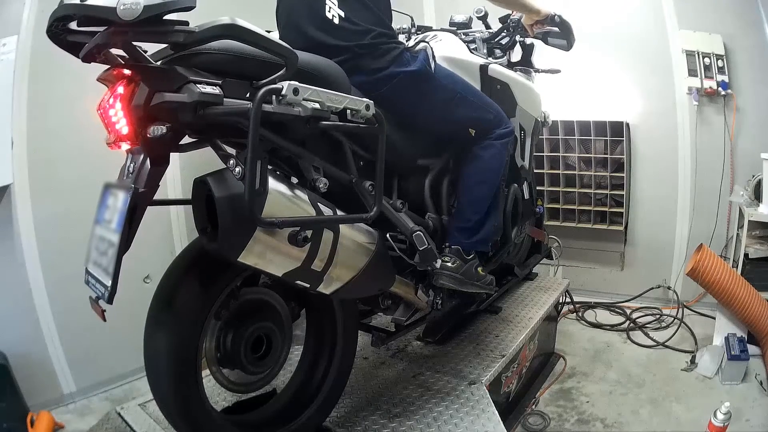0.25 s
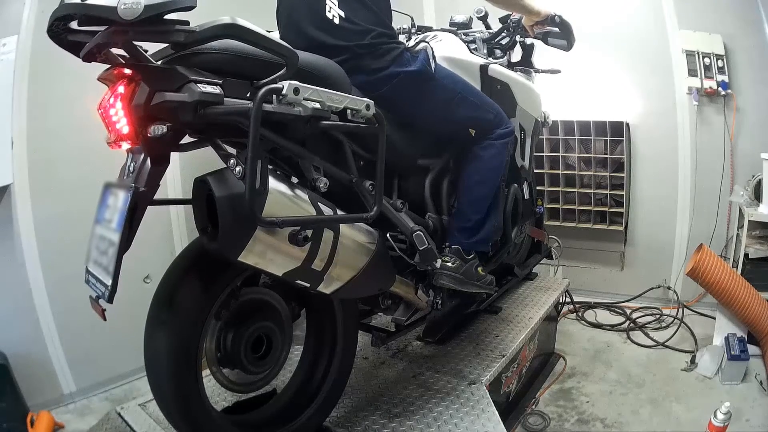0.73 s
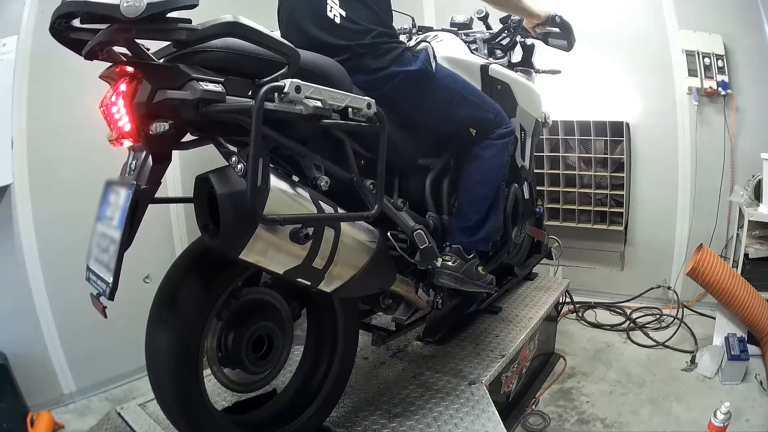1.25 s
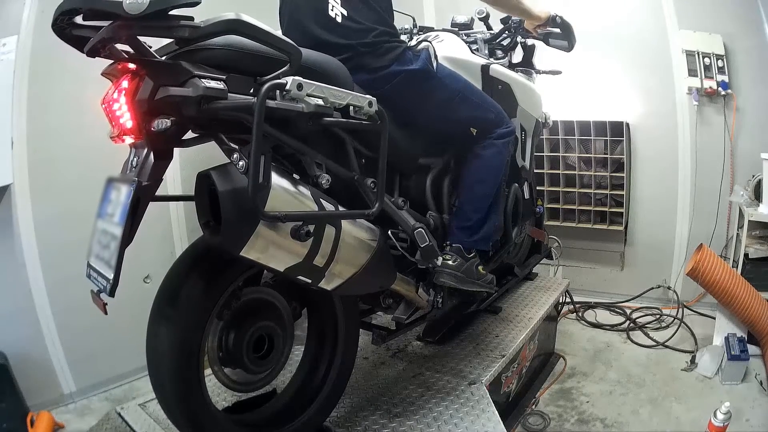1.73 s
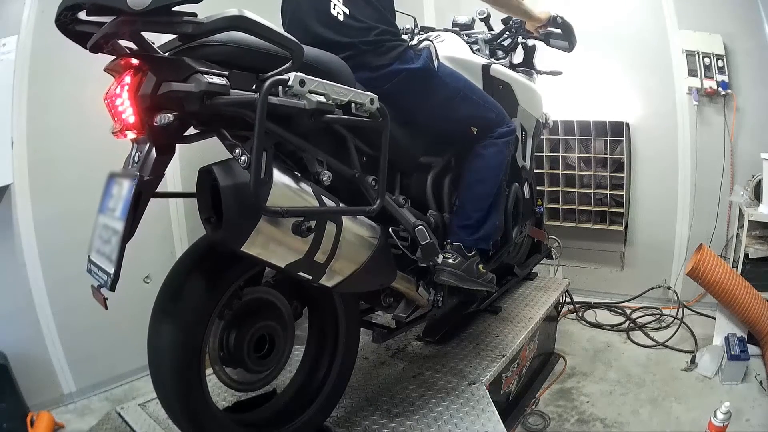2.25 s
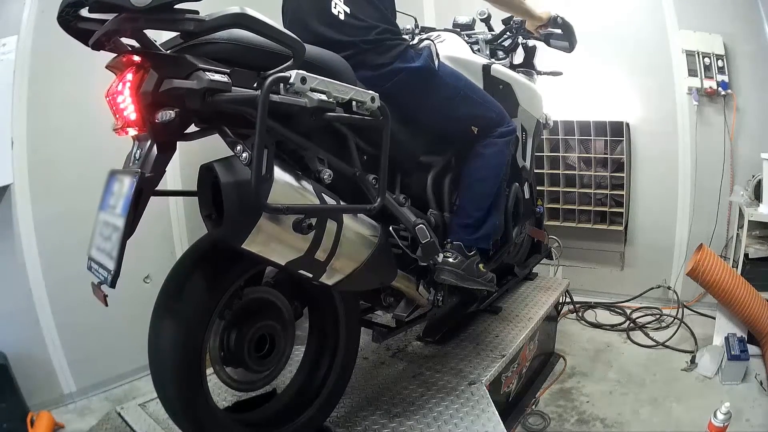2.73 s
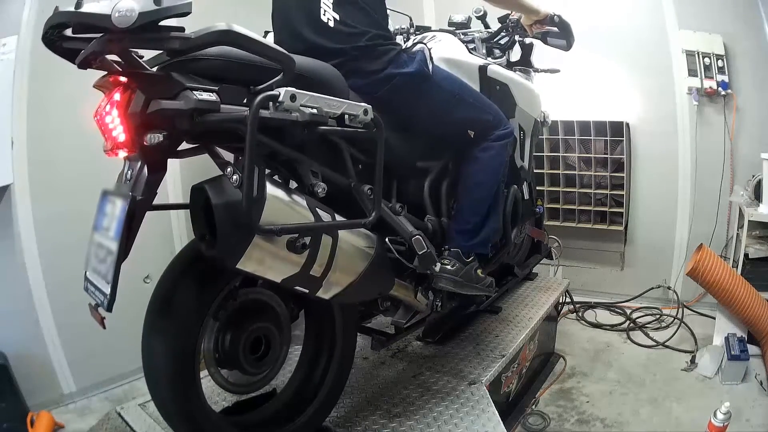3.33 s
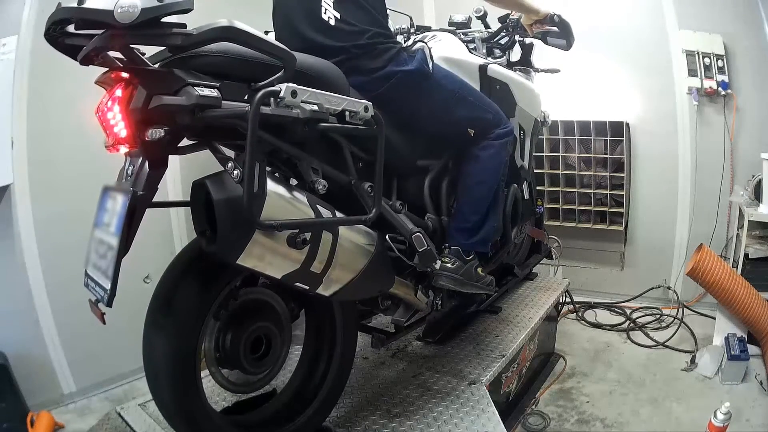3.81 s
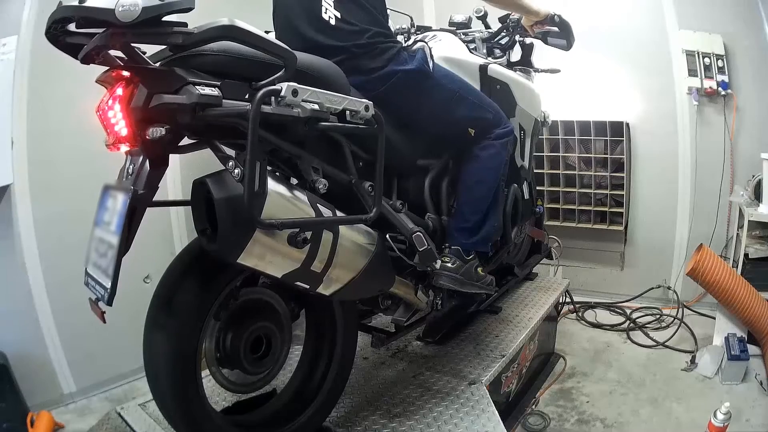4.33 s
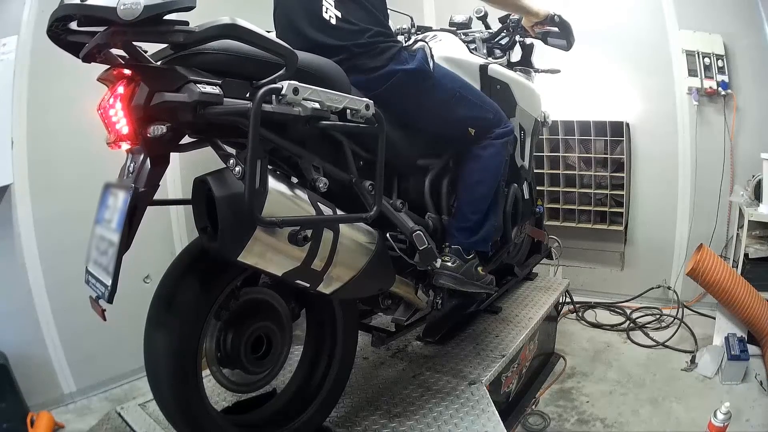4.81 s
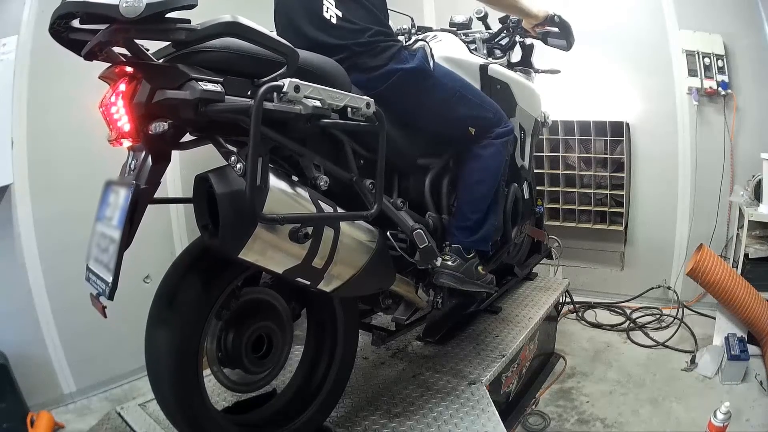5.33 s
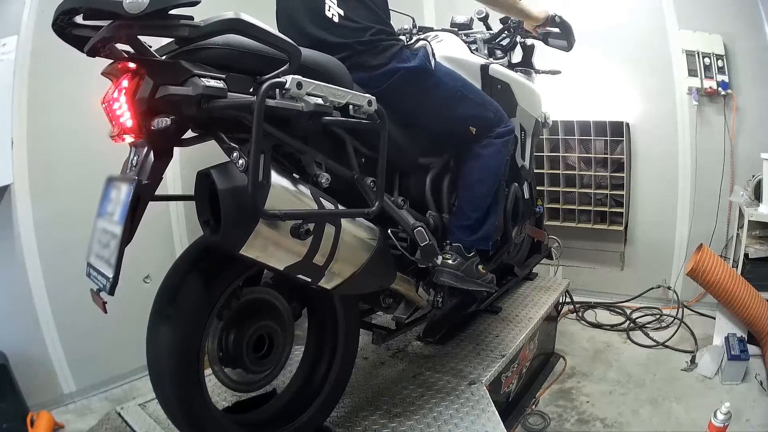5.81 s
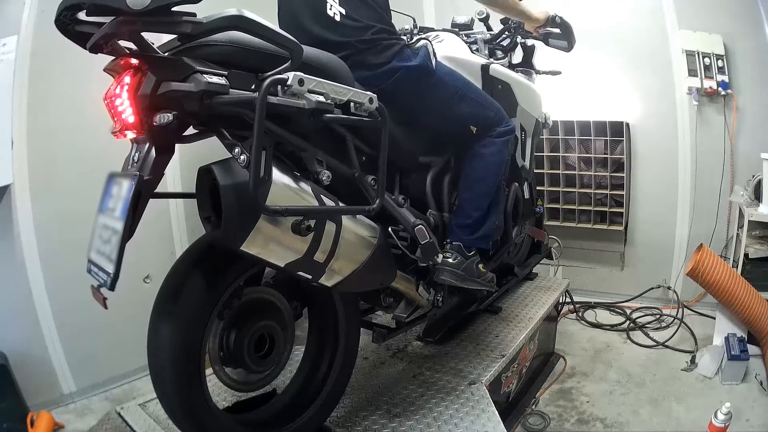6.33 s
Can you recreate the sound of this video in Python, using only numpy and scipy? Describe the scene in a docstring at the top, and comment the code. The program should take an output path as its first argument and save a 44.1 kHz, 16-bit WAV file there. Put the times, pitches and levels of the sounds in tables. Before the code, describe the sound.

A motorcycle under load on a roller in a small, bare workshop, heard close behind with short hard reflections. At 0 s the engine is already running at a medium-high pitch under part throttle, a raspy buzz with dense bright metal rattle. From about 0.8 s it opens up, climbing steadily and growing louder and harsher until 2.8 s, with a thin gear whine rising alongside and hiss of chain, tyre and rushing air swelling. At about 2.9 s the throttle shuts: the whine stops, the sound thins, dull soft thumps puff from the silencer, and pitch falls sharply until 3.1 s. It rebounds, wobbles around 3.3 s, then pulls again, nearly level until 4.3 s, rising faster and fuller from 5 s, ending abruptly near 6.6 s still at high revs. A faint blower runs steadily behind.

```python
"""Motorcycle pull on a roller dyno

A three-cylinder motorcycle in a small bare workshop revs up, shifts up once and pulls again.
The exhaust booms on the firing rate and rings its pipe resonances; a few dull puffs thump the silencer.
Valve gear and pistons rattle brightly in step with the crank, and a gear whines before the shift.
Chain, tyre and rushing air hiss over it all, as shaped noise; a cooling blower runs steadily behind."""
import sys
import numpy as np
from scipy import signal
from scipy.fft import rfft, irfft, next_fast_len
from scipy.io import wavfile
from scipy.ndimage import uniform_filter1d

SR = 44100
rng = np.random.default_rng(int(sys.argv[2]) if len(sys.argv) > 2 else 0)


def digitize_waveform(pressure):
    """Quantize a signal to 16-bit integers and store it at the path in sys.argv[1].

    Rows of a 2-D input are taken as channels; values are limited to [-1, 1].
    """
    field = np.atleast_2d(pressure).T
    bounded = np.clip(field, -1, 1)
    quanta = np.round(bounded * 32767).astype(np.int16)
    wavfile.write(sys.argv[1], SR, quanta)


N = 289737   # length in samples

CYLINDERS = 3    # firings in one four-stroke cycle
SHIFT_S = 2.88   # the lower gear stops carrying the load
FULL_HZ = 149.4  # below this firing rate the throttle-driven layers may weaken with the revs


def from_db(db):
    """Decibels to gain."""
    return 10 ** (np.asarray(db) / 20)


def rms_one(x):
    """Scale to unit power."""
    return x / np.sqrt(np.mean(x ** 2) + 1e-20)


def in_time(rows):
    """Draw straight lines between (seconds, value) points, sample by sample."""
    return np.interp(np.arange(N) / SR, *np.transpose(rows))


def colour(x, spectrum):
    """Filter a signal by a curve drawn over log frequency; rms 1."""
    size = next_fast_len(N + 4096)
    hz, level_db = np.transpose(spectrum)
    bins = np.maximum(np.fft.rfftfreq(size, 1 / SR), 1)
    gain = from_db(np.interp(np.log(bins), np.log(hz), level_db))
    return rms_one(irfft(rfft(x, size) * gain, size)[:N])


def drift(rate_hz):
    """Slow random wander with a spread of 1: noise through two equal low-pass poles."""
    step = 40   # samples between the points of the wander
    r = np.exp(-2 * np.pi * rate_hz * step / SR)
    noise = rng.standard_normal(N // step + 2002)
    slow = signal.lfilter([1], [1, -2 * r, r * r], noise)[2000:]   # drop the filter's start
    return np.interp(np.arange(N) / step, np.arange(len(slow)), rms_one(slow))


def resonate(x, hz, width_hz):
    """One two-pole resonance with a gain of 1 on top."""
    r = np.exp(-np.pi * width_hz / SR)
    poles = [1, -2 * r * np.cos(2 * np.pi * hz / SR), r * r]
    return signal.lfilter(np.array([1, 0, -1]) * (1 - r * r) / 2, poles, x)


def driven(throttle, speed, law):
    """Gain of a layer at this throttle opening and engine speed."""
    open_db, shut_loss_db, curvature, octave_loss_db = law
    octaves_below = np.maximum(np.log2(FULL_HZ / speed), 0)
    shut_loss = shut_loss_db * (1 - np.maximum(throttle, 0) ** curvature)
    return from_db(open_db - shut_loss - octave_loss_db * octaves_below)


# Engine speed through the pull, the upshift and the next pull.
# Each row: time in seconds, firing rate in firings per second.
ENGINE_SPEED = [(0, 118.0), (0.8, 125.1), (1.2, 132.4), (1.6, 141.3), (1.95, 151.8), (2.83, 184.4),
                (2.88, 179.7), (3.13, 140.9), (3.26, 150.0), (3.36, 151.0), (3.42, 146.1), (4.3, 149.8),
                (4.9, 155.2), (5.3, 160.8), (5.85, 172.4), (6.3, 184.2), (6.57, 191.8)]
# The rider's hand, which drives most layers. Each row: time in seconds, opening (0 shut, 1 wide open).
THROTTLE_HAND = [(0, 0.28), (.7, 0.36), (.9, 0.51), (1.25, 0.66), (1.55, 0.84), (2.03, 1.02), (2.35, .87),
                 (2.82, 0.88), (2.9, 0.24), (3.04, 0), (3.2, 0.12), (3.35, 0.4), (4.3, 0.55), (4.85, 0.65),
                 (5.3, 0.7), (5.62, 0.86), (6.1, 0.81), (6.57, 0.88)]


def ride():
    """Firing rate, throttle opening and the count of four-stroke cycles that turns the crank."""
    speed, throttle = in_time(ENGINE_SPEED), in_time(THROTTLE_HAND)
    cycles = np.cumsum(speed) / SR / CYLINDERS
    return speed, throttle, cycles


# First bounces off walls, floor and ceiling. Each row: delay in seconds, gain as a factor.
ROOM_ECHOES = [(.0031, .2), (.0083, -0.11), (0.0135, .1)]


def workshop(x, t60_s, wet_db):
    """Direct sound, first reflections and a short diffuse tail that decays 60 dB in t60_s."""
    t = np.arange(SR // 2) / SR
    first_delay_s = ROOM_ECHOES[0][0]
    tail = rng.standard_normal(len(t)) * from_db(-60 * t / t60_s) * (t > first_delay_s)
    response = from_db(wet_db) * tail / np.linalg.norm(tail)
    response[0] = 1
    for delay_s, gain in ROOM_ECHOES:
        response[int(delay_s * SR)] += gain
    return signal.fftconvolve(x, response)[:N]


# Spectrum of the dyno's cooling blower. Each row: frequency in Hz, relative level in dB per Hz.
BLOWER_SPECTRUM = [(15, -24), (28, -12), (70, -8), (110, 7), (220, 0.5), (400, 4.5), (520, 10), (700, -20),
                   (1100, 5), (1500, -2), (2100, 0), (3000, -0.5)]


def blower():
    """Steady turbulent noise from the dyno's cooling blower."""
    return from_db(-40.5) * colour(rng.standard_normal(N), BLOWER_SPECTRUM)


def throbbing_air(cycles, spectrum, throb, flutter_db):
    """Turbulent noise that swells a little with each firing and flutters at random; rms 1."""
    swell = 1 + throb * np.cos(2 * np.pi * CYLINDERS * cycles)
    flutter = from_db(flutter_db * drift(25))
    return colour(rng.standard_normal(N) * swell * flutter, spectrum)


# Spectrum of chain and tyre hiss. Each row: frequency in Hz, relative level in dB per Hz.
HISS_SPECTRUM = [(6000, -32), (8500, -9.5), (9700, -9.5), (10700, -1), (12100, 2), (13000, 2.5),
                 (14300, 1.5), (15200, 0), (16000, -14)]
# Hiss against throttle and revs. Columns: level wide open in dB, loss when shut in dB,
# curvature of the rise as an exponent, loss in dB per octave below FULL_HZ.
HISS_DRIVE = (-15, 5.5, 4, 2.5)


def chain_and_tyre_hiss(cycles, speed, throttle):
    """Chain and tyre make a fine high noise that grows with the throttle."""
    noise = throbbing_air(cycles, HISS_SPECTRUM, throb=0.048, flutter_db=0.4)
    return driven(throttle, speed, HISS_DRIVE) * noise


# Spectrum of the rushing air. Each row: frequency in Hz, relative level in dB per Hz.
RUSH_SPECTRUM = [(500, -26), (1500, -16.5), (2300, -3.5), (4300, -1), (6500, -4.5), (7600, -.5),
                 (9000, 0.5), (10500, 4.5), (13000, -24)]
# Rush against throttle and revs. Columns: level wide open in dB, loss when shut in dB,
# curvature of the rise as an exponent, loss in dB per octave below FULL_HZ.
RUSH_DRIVE = (-18, 9.5, 2.5, 0.5)


def rushing_air(cycles, speed, throttle):
    """Turbulent air rushes in a broad band that grows with the throttle."""
    noise = throbbing_air(cycles, RUSH_SPECTRUM, throb=0.063, flutter_db=0.7)
    return driven(throttle, speed, RUSH_DRIVE) * noise


# Whine of the lower gear. Each row: multiple of the mesh rate, relative level in dB.
GEAR_PARTIALS = [(1, -23), (3, -3), (4, 9.5), (5, -11), (6, -11)]
# Whine against throttle and revs. Columns: level wide open in dB, loss when shut in dB,
# curvature of the rise as an exponent, loss in dB per octave below FULL_HZ.
WHINE_DRIVE = (-36.5, 24, 2, 4)


def gear_whine(cycles, speed, throttle, waver_db, slack_rad):
    """Meshing teeth sing at a fixed ratio to the crank while the lower gear carries the load."""
    mesh_per_cycle = 29.85
    mesh = 2 * np.pi * mesh_per_cycle * cycles + slack_rad * drift(22)
    tones = np.zeros(N)
    for multiple, level_db in GEAR_PARTIALS:
        tones += from_db(level_db + waver_db * drift(12)) * np.sin(round(multiple) * mesh)
    engaged = in_time([(SHIFT_S - .05, 1), (SHIFT_S, 0)])
    return driven(throttle, speed, WHINE_DRIVE) * engaged * tones


# Dull puffs from the silencer, loudest as the throttle shuts and opens.
# Each row: start in seconds, level in dB at the top of the envelope.
SILENCER_PUFFS = [(2.882, -40), (2.907, -48), (3.216, -39), (3.391, -45), (3.84, -48), (4.057, -50),
                  (5.86, -45)]


def silencer_puffs(hz, rise_s):
    """Single uneven firings thump the silencer's lowest resonance: a sine that swells and dies away."""
    out = np.zeros(N)
    t = np.arange(SR // 5) / SR
    envelope = t / rise_s * np.exp(1 - t / rise_s)
    thump = np.sin(2 * np.pi * hz * t) * envelope
    for start_s, level_db in SILENCER_PUFFS:
        at = int(start_s * SR)
        out[at:at + len(t)] += from_db(level_db) * thump[:N - at]
    return out


# Spectrum of the ringing engine casing. Each row: frequency in Hz, relative level in dB per Hz.
CASING_SPECTRUM = [(300, -38.5), (600, -27.5), (1000, -24.5), (1450, -26), (2000, -19.5), (2300, -11),
                   (2600, -7.5), (2850, -1.5), (3150, -0.5), (3500, -3), (3850, -9), (4250, -14),
                   (4850, -10.5), (5700, -16), (7000, -21), (10000, -51)]
# Rattle against throttle and revs. Columns: level wide open in dB, loss when shut in dB,
# curvature of the rise as an exponent, loss in dB per octave below FULL_HZ.
RATTLE_DRIVE = (-15, 4.5, 0.5, 11)


def engine_rattle(cycles, speed, throttle, count, jitter_s, spread_db, scatter_db, loose_db, throb):
    """Valves and pistons strike the casing at set crank angles; the chain adds loose chatter."""
    # each of the strikes in a cycle has its own angle, strength and direction
    angles = (np.arange(count) + rng.uniform(-0.506, 0.49, count)) / count
    strength = from_db(spread_db * rng.permutation(np.linspace(-1, 1, count)))
    contact = strength * rng.choice([-1, 1], count)
    due = np.arange(int(cycles[-1]) + 1)[:, None] + angles
    at = np.interp(due, cycles, np.arange(N)) + jitter_s * SR * rng.standard_normal(due.shape)
    force = contact * from_db(scatter_db * rng.standard_normal(due.shape)) * (due < cycles[-1])
    at, force = np.clip(at.ravel(), 0, N - 2), force.ravel()
    # share each click between its two nearest samples
    whole, part = at.astype(int), at % 1
    clicks = np.bincount(whole, force * (1 - part), N) + np.bincount(whole + 1, force * part, N)
    knocks = colour(workshop(clicks, t60_s=0.057, wet_db=-5.5), CASING_SPECTRUM)
    # even strength at every speed
    knocks = knocks / np.sqrt(uniform_filter1d(knocks ** 2, size=SR // 6))
    chatter = from_db(loose_db) * throbbing_air(cycles, CASING_SPECTRUM, throb, flutter_db=1.0)
    return driven(throttle, speed, RATTLE_DRIVE) * rms_one(knocks + chatter)


# Standing waves of the room that the octave of the firing tone sweeps through.
# Each row: frequency in Hz, gain in dB.
ROOM_STANDING_WAVES = [(240, -1.5), (260, -4), (269, -12.5), (283, 1), (299, -3.5), (311, .3), (331, -3.5),
                       (346, 0), (363, -4.5), (373, -16), (382, -8)]
# Octave tone against throttle and revs. Columns: level wide open in dB, loss when shut in dB,
# curvature of the rise as an exponent, loss in dB per octave below FULL_HZ.
OCTAVE_DRIVE = (-34, 13.5, 1.0, 0.0)


def exhaust_boom(cycles, speed, throttle, waver_db):
    """Two clean low tones pass the silencer; the lower fades at coast and inverts in engine braking."""
    boom_db, boom_db_per_octave = -32.0, 4   # level at FULL_HZ per unit of throttle; growth with revs
    coast_throttle = 0.43   # opening at which the engine neither pulls nor brakes
    firings = 2 * np.pi * CYLINDERS * cycles
    rev_gain = from_db(boom_db + boom_db_per_octave * np.log2(speed / FULL_HZ))
    firing_gain = rev_gain * (throttle - coast_throttle)
    room_gain = from_db(np.interp(2 * speed, *np.transpose(ROOM_STANDING_WAVES)))
    octave_gain = driven(throttle, speed, OCTAVE_DRIVE) * room_gain
    firing_tone = firing_gain * from_db(waver_db * drift(15)) * np.sin(firings)
    octave_tone = octave_gain * from_db(waver_db * drift(15)) * np.sin(2 * firings)
    return np.sqrt(2) * (firing_tone + octave_tone)


# Pressure wave of one four-stroke cycle; every third order is a firing harmonic.
# Each row: multiple of the cycle rate, relative level in dB.
CYCLE_ORDERS = [(4, 2), (5, -6), (7, -10), (8, -21), (9, 7.5), (10, 1.5), (11, 0), (12, -2), (13, -1.5),
                (14, -5.5), (15, -1.5), (16, -4.5), (17, -10), (18, 2), (19, -10), (20, -8), (21, 1),
                (22, -14), (23, -4), (24, 1), (25, -13), (26, -26), (27, 1), (28, -24), (29, -19),
                (30, -0.5), (31, -37), (33, -1), (36, 0.5), (39, -4), (42, 2.5), (45, -4.5), (48, 1),
                (51, -1), (54, 0), (57, -2), (60, -8)]
# Resonances of pipe and silencer. Each row: frequency in Hz, width in Hz, level in dB.
PIPE_RESONANCES = [(362, 93, -50), (496, 32, -53), (509, 27, -50), (694, 85, -47), (847, 15, -38),
                   (887, 56, -43.5), (963.6, 14, -29.5), (966.2, 32, -35), (1210, 62, -35), (1362, 69, -46),
                   (1414, 79, -45.5), (1588, 35, -45.5), (1720, 70, -41.5), (1875, 16, -35.5),
                   (1983, 53, -35.5), (2061, 25, -31), (2340, 120, -34.5), (2386, 92, -29.5),
                   (2730, 67, -24.5)]
# Growl against throttle and revs. Columns: level wide open in dB, loss when shut in dB,
# curvature of the rise as an exponent, loss in dB per octave below FULL_HZ.
GROWL_DRIVE = (2.5, 18.3, 1.02, 9.4)


def exhaust_growl(cycles, speed, throttle, jitter_cycles, uneven_db, between_db, gas_db):
    """Three slightly unequal pulses a cycle, with a puff of turbulent gas in each, ring the pipe."""
    size = 2048   # points in one cycle of the wave
    order_db = np.full(size // 2 + 1, -200.0)
    order_db[32:60] = between_db   # a floor for high orders that the table leaves out
    for order, level_db in CYCLE_ORDERS:
        order_db[int(round(order))] = level_db
    # firing harmonics line up into pulses; the differences between cylinders fall anywhere in the cycle
    unaligned = np.arange(len(order_db)) % CYLINDERS > 0
    turn = rng.random(len(order_db)) * unaligned
    wave = irfft(from_db(order_db) * np.exp(2j * np.pi * turn)) * size / np.sqrt(2)
    angle = (cycles + jitter_cycles * drift(46)) % 1
    pulses = np.interp(angle * size, np.arange(size), wave) * from_db(uneven_db * drift(64))
    gas_swell = 1 + np.cos(2 * np.pi * CYLINDERS * cycles)
    gas = from_db(gas_db) * rng.standard_normal(N) * gas_swell
    flow = (pulses + gas) * driven(throttle, speed, GROWL_DRIVE)
    growl = np.zeros(N)
    for k, (hz, width_hz, level_db) in enumerate(PIPE_RESONANCES):
        polarity = (-1) ** k
        growl += polarity * from_db(level_db) * resonate(flow, hz, width_hz)
    return growl


def scene():
    """The engine layers follow crank and throttle over a steady blower; both channels hear the same."""
    speed, throttle, cycles = ride()
    sound = blower()
    sound += chain_and_tyre_hiss(cycles, speed, throttle)
    sound += rushing_air(cycles, speed, throttle)
    sound += gear_whine(cycles, speed, throttle, waver_db=3.0, slack_rad=0.47)
    sound += silencer_puffs(hz=111, rise_s=.009)
    sound += engine_rattle(cycles, speed, throttle, count=36, jitter_s=.000015, spread_db=2.0,
                           scatter_db=1.5, loose_db=0.0, throb=0.2)
    sound += exhaust_boom(cycles, speed, throttle, waver_db=0.5)
    growl = exhaust_growl(cycles, speed, throttle, jitter_cycles=0.00082, uneven_db=1.48,
                          between_db=-16.0, gas_db=2.5)
    # as the revs climb, each harmonic swells and fades on its way through the room's response
    sound += workshop(growl, t60_s=0.19, wet_db=-5.0)
    return np.array([sound, sound])


def record(dry):
    """The highest peaks are rounded below 0.8 and the top is cut steeply."""
    rounded = dry / (1 + (dry / .8) ** 8) ** (1 / 8)
    cutoff_hz = 15800
    lowpass = signal.firwin(401, cutoff_hz, window=("kaiser", 10), fs=SR)
    return signal.fftconvolve(rounded, lowpass[None], "same")


dry = scene()
out = record(dry)
digitize_waveform(out)
```